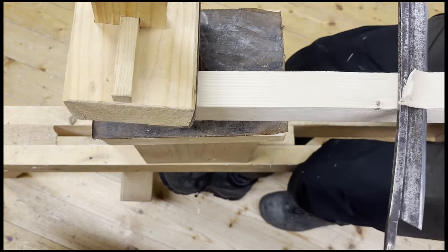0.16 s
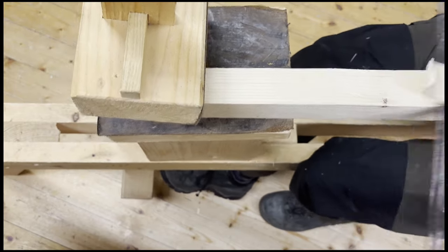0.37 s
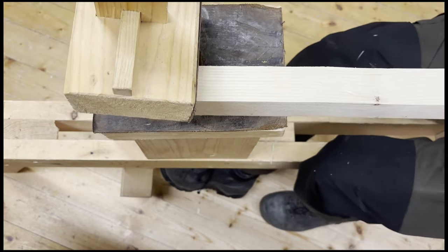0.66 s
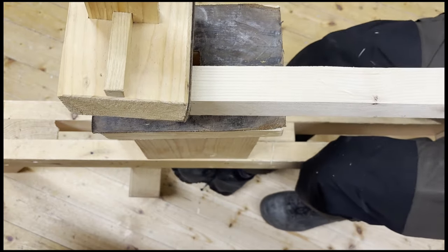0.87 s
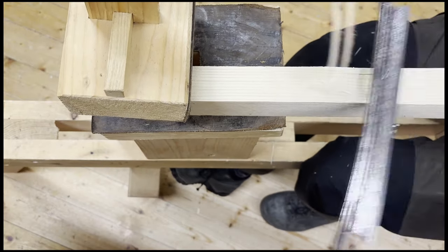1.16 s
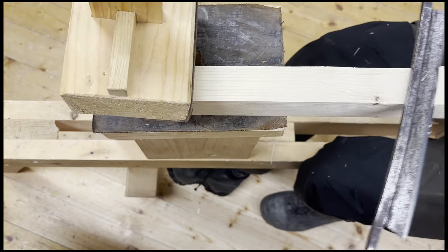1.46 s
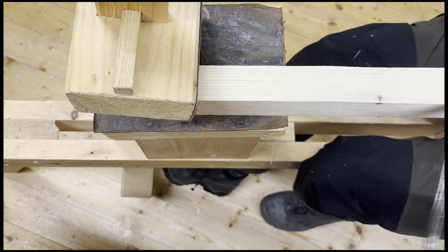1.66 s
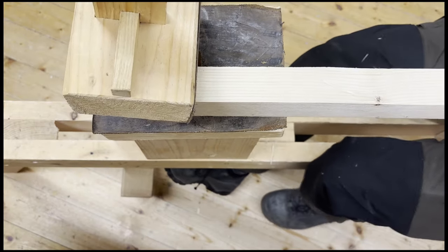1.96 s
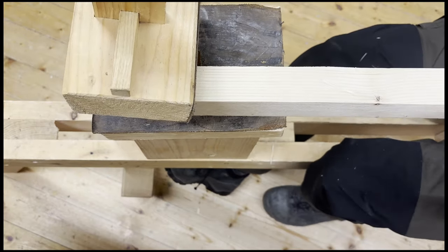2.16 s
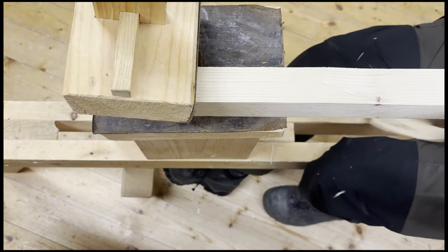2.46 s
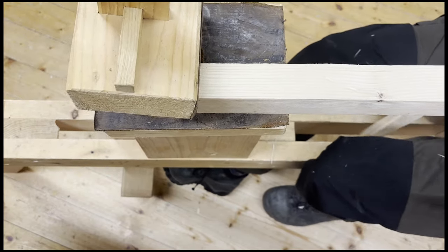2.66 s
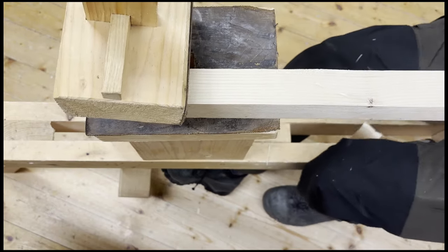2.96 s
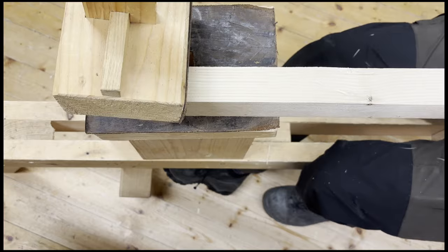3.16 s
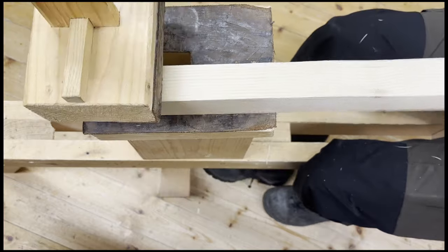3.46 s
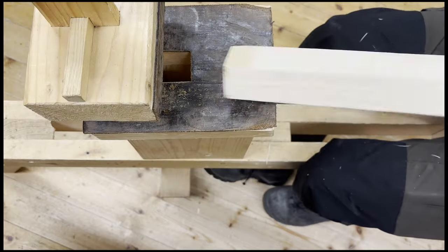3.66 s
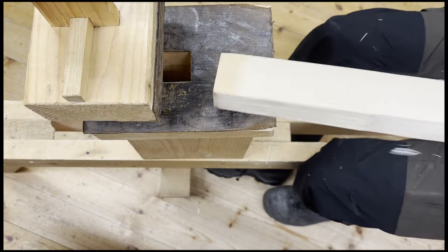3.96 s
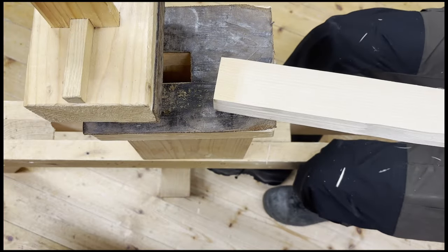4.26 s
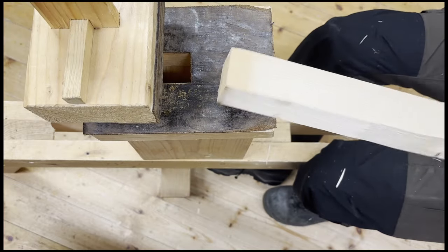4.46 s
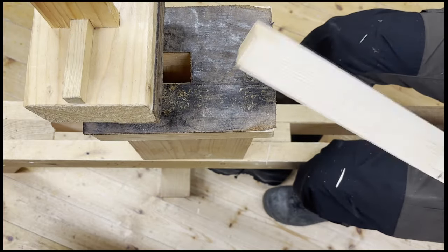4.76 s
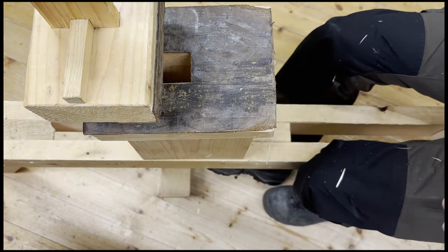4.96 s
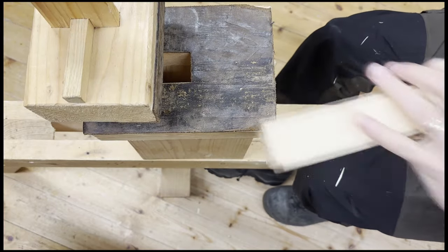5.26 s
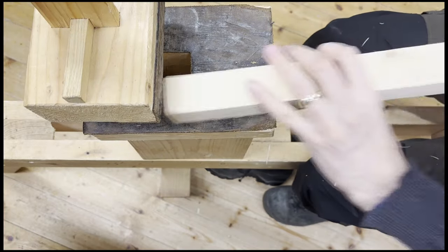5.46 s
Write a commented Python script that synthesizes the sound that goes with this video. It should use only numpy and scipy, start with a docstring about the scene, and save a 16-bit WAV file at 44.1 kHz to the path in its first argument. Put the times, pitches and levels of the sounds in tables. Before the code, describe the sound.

Close dry scraping and splitting of wood in uneven bursts, woody knocks, a firm release thump, then faint sliding and handling.

```python
"""In a small quiet workshop a drawknife shaves a softwood blank clamped in a shaving horse, heard close in stereo.
Random fractures, gated by the pulls of the blade, make a dense rasp that rings the blank and shakes the bench.
Shavings split off in bright bursts of crackle, wavering sines squeak, and knocks and bass thumps ring modes of wood.
Then the clamp is let go with a thump, and the blank slides out and is turned in the hands: swells of brushed noise.
"""
import sys
import numpy as np
from scipy import signal
from scipy.fft import rfft, irfft, next_fast_len
from scipy.io import wavfile

SR = 44100
rng = np.random.default_rng(int(sys.argv[2]) if len(sys.argv) > 2 else 0)


def pcm_store(signal):
    """Save signal as 16-bit PCM."""
    levels = np.round(np.clip(np.atleast_2d(signal), -1, 1) * 32767)
    wavfile.write(sys.argv[1], SR, levels.astype(np.int16).T)


N = 246959  # samples, 5.6 s
T = np.arange(N) / SR
SIZE = next_fast_len(N + SR, True)  # transform length, with a second to spare for tails
HZ = np.arange(SIZE // 2 + 1) * SR / SIZE + 1e-3  # the small offset keeps divisions and logs finite

# spectrum of breaking fibres and of contact ticks: freq_hz [Hz], level_db [dB, relative]
FIBRES_SPECTRUM = [(200, -30.5), (900, -6.5), (2000, -14.5), (2750, 1.5), (3400, 0.5), (4400, -4),
                   (5400, 5), (6500, 3.5), (8000, -3.5), (10000, -4), (12500, 0), (16000, -25.5)]
# broad spectrum of the wood between its modes: freq_hz [Hz], level_db [dB, relative]
WOOD_SPECTRUM = [(100, -30), (300, 3), (550, 1.5), (1100, 9), (1600, -3), (2200, 5), (2800, -14),
                 (6000, -51), (16000, -64.5)]


def undb(db):
    """Decibels to gain."""
    return 10 ** (np.asarray(db) / 20)


def unit(x):
    """Scale to rms 1."""
    return x / np.sqrt(np.mean(np.abs(x) ** 2))


def through(x, response):
    """Filter a sound by a frequency response."""
    return irfft(rfft(x, SIZE) * response, SIZE)[..., :N]


def colour(points):
    """Causal response through (Hz, dB) points, with unit power gain."""
    hz, db = np.transpose(points)
    level_db = np.interp(np.log(HZ), np.log(hz), db)
    # folding the cepstrum onto positive time gives minimum phase
    cepstrum = irfft(np.log(undb(level_db)), SIZE)
    return unit(np.exp(rfft(2 * cepstrum[:SIZE // 2], SIZE)))


def body(modes):
    """Response of (Hz, width Hz, dB) resonances of alternating sign, with unit power gain."""
    response = 0
    for k, (hz, width, db) in enumerate(modes):
        resonance = undb(db) / (1 + 1j * (HZ - hz * hz / HZ) / width)
        response = response + (-1) ** k * resonance
    return unit(response)


def walk(rate):
    """Smooth chance with about `rate` turns a second and spread 1."""
    return unit(np.interp(T * rate, np.arange(N), rng.standard_normal(N)))


def grains(rate, spread_db):
    """Random tiny fractures, about `rate` a second, of very unequal size; rms 1."""
    happens = rng.random(N) < rate / SR
    sign = rng.choice([-1, 1], N)
    size = undb(spread_db * np.minimum(rng.exponential(size=N), 5))
    return unit(happens * sign * size)


def bursts(times, levels_db, length):
    """Envelope of short bursts that start at once and fade on a bell curve of the given length in s."""
    out = np.zeros(N)
    for s, db in zip(times, levels_db):
        start = int(s * SR)
        t = T[:N - start][:SR // 10]
        out[start:start + len(t)] += undb(db) * np.exp(-(t / length) ** 2)
    return out


def pushes(times, levels_db):
    """One impulse for each event."""
    out = np.zeros(N)
    out[np.clip((times * SR).astype(int), 0, N - 1)] = undb(levels_db)
    return out


def strokes(table, bite_s, sag_db_per_s, release_db_per_s):
    """Attack, sagging hold and release for rows (s, length s, dB, ..): one gain curve for each dB column."""
    out = np.zeros((len(table[0]) - 2, N))
    for s, length, *db in table:
        span = slice(max(int(s * SR), 0), int((s + length + .5) * SR))
        t = np.maximum(T[span] - s, 0)
        attack = np.minimum(t / bite_s, 1)
        fall_db = sag_db_per_s * t + release_db_per_s * np.maximum(t - length, 0)
        # overlapping strokes add in power
        out[:, span] = np.hypot(out[:, span], np.outer(undb(db), attack * undb(-fall_db)))
    return out


def swells(table, roundness):
    """Smooth rise and fall for rows (s of the peak, rise s, fall s, dB, ..): one gain curve for each dB column."""
    power = 0
    for s, rise, fall, *db in table:
        away = np.maximum((s - T) / rise, (T - s) / fall)
        shape = np.exp(-np.minimum(away ** roundness, 20))
        power = power + np.outer(undb(db), shape) ** 2
    return np.sqrt(power)


def room_noise():
    """The faint steady noise of the room: coloured noise, independent in mid and side."""
    # freq_hz [Hz], level_db [dB, relative]
    quiet_spectrum = [(15, -46.5), (25, -9.5), (81, 1), (146, -5.5), (588, -8.5), (2180, -26), (2850, -23),
                      (5140, -28.5), (5720, -33.5), (7890, -34.5), (15000, -38)]
    return undb(-62.5) * through(rng.standard_normal((2, N)), colour(quiet_spectrum))


def blank_response():
    """The blank held in the clamp: its sharp modes over a broad woody response."""
    # modes of the clamped blank: pitch_hz [Hz], width_hz [Hz], level_db [dB, relative]
    blank_modes = [(636, 18, 1.5), (844, 43, 8), (847, 87, -3.5), (1036, 65, 8.5), (1098, 300, 0),
                   (1237, 54, 6), (1352, 85, -0.5), (1686, 16, -0.5), (1980, 15, -19), (2083, 120, -5.5),
                   (2206, 96, -6), (2320, 69, -7), (2980, 510, -11.5), (3570, 20, -26.5), (3970, 24, -18.5),
                   (4400, 23, -24)]
    return unit(body(blank_modes) + undb(-5.0) * colour(WOOD_SPECTRUM))


def bench_response():
    """The shaving horse: low modes over a faint broad response weighted to the bass."""
    # modes of the shaving horse: pitch_hz [Hz], width_hz [Hz], level_db [dB, relative]
    bench_modes = [(59.5, 9.7, -12), (72.7, 16, 1), (112, 39, -6.5), (145.4, 18, 1.5), (181.3, 18, 4.5),
                   (207, 41, -2.5), (309, 100, -5.5), (334.4, 25, -2.5), (401, 12, -12), (435, 21, -7)]
    broad = colour([(15, -12.5), (40, 2.5), (70, 0.5), (200, -22.0), (2000, -55.5)])
    return unit(body(bench_modes) + undb(-31.0) * broad)


def blade_contact():
    """Cuts, skims and tears add in power: gains of fibre hiss, top treble, blank ring and bench shake."""
    # pulls of the blade: start_s [s], length_s [s], hiss_db [dB], top_db [dB relative to hiss],
    # ring_db of the blank [dB], shake_db of the bench [dB]
    cut_rows = [(-0.02, 0.023, -37.5, -1.5, -29, -28.5), (0.024, 0.034, -28, -3.5, -26.5, -28),
                (0.305, 0.037, -27.5, -1, -28, -37), (0.345, 0.044, -24, 0.5, -24.5, -20),
                (0.395, 0.03, -19.5, -0.5, -29, -16), (0.491, 0.011, -27, -10, -23, -50),
                (0.608, .03, -31.5, -4.5, -26.5, -30), (0.699, 0.054, -28.5, -4, -26.5, -38),
                (1.431, 0.18, -30, -2, -24, -31), (1.617, 0.019, -35.5, 0, -34, -29),
                (1.651, 0.067, -32.5, -2, -28, -32.5), (1.776, 0.016, -39, -1, -30.5, -29),
                (1.827, .026, -29, -16.5, -24.5, -23), (1.913, 0.021, -38, -17, -38.5, -39.5),
                (1.976, 0.052, -34, -3, -29, -35), (2.437, 0.083, -44, 3.5, -30.5, -37.5),
                (2.484, 0.13, -30, -2.5, -26.5, -33), (2.773, 0.029, -26.5, -7.5, -26, -24.5),
                (2.841, 0.039, -36, -4, -32, -30.5), (3.16, 0.046, -30, -3, -24, -30),
                (3.22, 0.082, -34.5, -5, -30.5, -33), (3.262, 0.043, -32.5, -4, -26.5, -31),
                (3.325, 0.023, -36.5, -4, -39, -28.5), (3.368, 0.0093, -32, -3.5, -27.5, -29.5)]
    # light scrapes without a bite, of the blade between cuts and of the clamp as the blank slips out:
    # start_s [s], length_s [s], hiss_db [dB], ring_db of the blank [dB], shake_db of the bench [dB]
    skim_rows = [(0.08, 0.072, -45.5, -44, -33.5), (0.15, 0.14, -94.5, -58, -39),
                 (0.53, 0.075, -44, -51.5, -52), (0.788, 0.014, -53, -53, -34.5),
                 (0.861, 0.14, -58.5, -56, -47.5), (1.029, 0.021, -51.5, -52, -43.5),
                 (1.08, 0.032, -53, -41, -35.5), (1.195, 0.026, -53, -46.5, -43.5),
                 (1.268, 0.32, -53.5, -48.5, -40.5), (2.05, 0.12, -48, -51, -42.5),
                 (2.304, 0.041, -60, -48.5, -35.5), (2.402, 0.034, -48, -40, -53.5),
                 (2.621, 0.11, -50, -44, -43.5), (2.88, 0.11, -58.5, -46.5, -39),
                 (3.03, 0.023, -56, -59, -52), (3.143, 0.0099, -45, -28.5, -39),
                 (3.467, 0.13, -51, -62, -52), (3.529, 0.016, -52.5, -42.5, -50),
                 (3.568, 0.024, -37, -39, -34), (3.633, 0.06, -55.5, -60, -51),
                 (3.748, 0.081, -68, -63, -51.5)]
    # a shaving tears louder and louder until it parts: parting_s [s], build_up_s [s], hiss_db [dB]
    tear_rows = [(0.484, .05, -21), (1.815, 0.049, -20.5), (2.772, 0.16, -36.5)]
    skim_top_db = -2.5  # relative to the hiss
    parting_s, tear_top_db, tear_ring_db = .003, 0, -8  # fall after the parting; levels relative to the hiss

    cuts = [(s, length, hiss, hiss + top, ring, shake) for s, length, hiss, top, ring, shake in cut_rows]
    skims = [(s, length, hiss, hiss + skim_top_db, ring, shake) for s, length, hiss, ring, shake in skim_rows]
    # a tear leaves the bench still
    tears = [(s, build, parting_s, hiss, hiss + tear_top_db, hiss + tear_ring_db, -np.inf)
             for s, build, hiss in tear_rows]

    # after the bite the pull eases as the arms draw in, then the edge runs out
    cutting = strokes(cuts, bite_s=.004, sag_db_per_s=17.5, release_db_per_s=419.5)
    skimming = strokes(skims, bite_s=0.017, sag_db_per_s=15, release_db_per_s=297.5)
    tearing = swells(tears, roundness=1.33)
    return np.sqrt(cutting ** 2 + skimming ** 2 + tearing ** 2)


def drawknife(blank, bench):
    """The edge sticks and slips; each slip breaks fibres, rings the blank and tugs at the bench."""
    # spectrum of the finest fibres: freq_hz [Hz], level_db [dB, relative]
    fine_spectrum = [(2000, -46), (7000, -29), (10000, 3.5), (12200, 9.5), (14000, 0), (16000, -0.5)]
    hiss, top, ring, shake = blade_contact()
    slip = unit(undb(2.5 * walk(600) + 1.1 * walk(120)))
    # now and then a whole bundle of fibres gives way among the fine ones
    bundles = grains(rate=300, spread_db=1.0)
    fractures = slip * unit(grains(rate=12000, spread_db=4.0) + undb(-7.0) * bundles)
    tugs = slip * unit(grains(rate=3500, spread_db=3.0) + undb(-10.0) * bundles)

    rasp = undb(0.5) * through(fractures * hiss, colour(FIBRES_SPECTRUM))
    fizz = undb(4.0) * through(fractures * top, colour(fine_spectrum))
    blank_ring = undb(-2.5) * through(tugs * ring, blank)
    bench_shake = undb(-4.5) * through(tugs * shake, bench)
    return rasp + fizz, blank_ring + bench_shake


def squeaks():
    """Friction locks on one resonance of the blank for a moment: a sine of unsteady pitch and level."""
    # start_s [s], level_db [dB, relative], pitch_hz [Hz, centre of the waver], length_s [s]
    squeak_rows = [(0.026, -17.5, 1136, 0.019), (0.04, -13.5, 1355, 0.019), (0.307, -12.5, 2140, 0.017),
                   (0.31, -13.5, 1366, 0.02), (0.352, -3.5, 1280, 0.0042), (0.497, -19.5, 1110, 0.0093),
                   (0.632, -23, 1304, 0.0097), (0.718, -20.5, 1914, 0.054), (1.451, -15, 1006, 0.018),
                   (1.538, -17, 1023, 0.026), (1.983, -11.5, 1043, 0.012), (2.494, -22, 1280, 0.023),
                   (2.838, -29.5, 1110, 0.02), (2.862, -9, 1025, 0.015), (3.167, -17.5, 1130, 0.02),
                   (3.206, -12.5, 1044, 0.025), (3.258, -15.5, 642, 0.023), (3.279, -17.5, 825, 0.058),
                   (3.377, -15, 2084, 0.0091), (5.034, -44.5, 1040, 0.03)]
    out = np.zeros(N)
    waver, flutter = walk(250), walk(300)
    for s, db, hz, length in squeak_rows:
        span = slice(int(s * SR), int(s * SR) + SR // 10)
        t = T[span] - T[span][0]
        swell = (1 - np.exp(-t / 0.00067)) * np.exp(-(t / length) ** 2)
        pitch_hz = hz * (1 + 0.046 * waver[span])
        phase = 2 * np.pi * np.cumsum(pitch_hz) / SR
        out[span] += undb(db - 8.5 + 1.6 * flutter[span]) * swell * np.sin(phase)
    return out


def knocks(blank, bench):
    """A blow ticks at the contact and rings clamp and blank; the heavy bench answers a moment later."""
    # blade, blank and clamp knocking together: start_s [s], clack_db, thud_db of the bench,
    # ring_db of the blank, tick_db of the contact [all dB, relative within each part]
    knock_rows = [(0.054, -33.5, -34, -25.5, -24.5), (0.262, -49.5, -59, -51.5, -71.5),
                  (0.352, -31.5, -26.5, -25.5, -31), (0.4233, -22, -7.5, -32.5, -17.5),
                  (0.437, -34, -27, -33, -28.5), (1.024, -39, -60, -46, -46), (1.111, -32, -42, -38, -38),
                  (1.273, -32.5, -50, -40.5, -42), (1.395, -40, -54.5, -33.5, -35.5),
                  (1.652, -32.5, -23.5, -26, -25), (1.81, -30.5, -33, -22.5, -26),
                  (1.915, -29.5, -30.5, -28, -25), (2.323, -26.5, -31.5, -43.5, -41),
                  (2.792, -35.5, -32, -28, -33.5), (2.835, -34, -21, -27.5, -23),
                  (2.945, -31.5, -27, -34, -42), (3.3988, -8, -25, -18.5, -15), (3.411, -18, -6, -40, -36),
                  (3.574, -21.5, -31.5, -24, -25), (3.739, -40, -41.5, -61, -48),
                  (5.165, -61, -59, -49, -47), (5.423, -54, -44, -53.5, -46.5), (5.517, -40, -28, -47, -42)]
    # modes of the clamp head and the work rest under it: pitch_hz [Hz], width_hz [Hz], level_db [dB, relative]
    clamp_modes = [(317, 50, -13.5), (386, 23, -8.5), (426, 67, 1.5), (531, 10, 4.5), (596, 46, -2),
                   (680, 90, -10.5), (790, 23, 5.5), (940, 240, -5), (1180, 110, -4), (1410, 120, -13.5)]
    # broad spectrum of the clack: freq_hz [Hz], level_db [dB, relative]
    clack_spectrum = [(80, -21), (250, -11.5), (420, 3.5), (580, 9.5), (850, -16), (1400, -28), (3000, -34),
                      (12000, -51.5)]
    s, clack_db, thud_db, ring_db, tick_db = np.transpose(knock_rows)

    # the struck face moves at once, the modes build up after it
    clamp = body(clamp_modes) + undb(-7.0) * colour(clack_spectrum)
    clack = through(pushes(s, clack_db + 13.5), clamp)
    rattle_noise = bursts(s, clack_db - 8.5, 0.012) * rng.standard_normal(N)
    rattle = through(rattle_noise, colour(clack_spectrum))
    crack_noise = bursts(s, ring_db + 3.0, 0.0044) * rng.standard_normal(N)
    crack = through(crack_noise, colour(WOOD_SPECTRUM))
    ring = through(pushes(s, ring_db + 19.5), blank)
    tick_noise = bursts(s, tick_db - 4.0, 0.0044) * rng.standard_normal(N)
    tick = through(tick_noise, colour(FIBRES_SPECTRUM))

    # the plank under the clamp bends, heavily damped, for a cycle or two: 183 Hz, 150 Hz wide
    give = undb(-1) * unit(body([(183, 150, 0)]) ** 2)
    # a short blow hardly moves the bench's slowest sway: a low cut around 90 Hz
    sway = undb(-4.0) * bench / (1 - 1j * 90 / HZ) ** 3
    thud = through(pushes(s + 0.002986, thud_db + 22.0), give + sway)
    return clack + rattle + crack + ring + tick + thud


def splinters():
    """A split runs ahead of the blade: a few milliseconds of bright crackle that swell and stop."""
    # splinters snapping and chips ticking: start_s [s], level_db [dB, relative], length_s [s]
    snap_rows = [(0.057, -30.5, 0.0012), (0.15, -29.5, 0.0007), (0.4672, -13.5, 0.00059),
                 (0.48, -15, 0.0018), (0.518, -20.5, 0.0021), (0.568, -17.5, 0.0011),
                 (0.603, -18.5, 0.0026), (0.853, -41, 0.0012), (1.024, -39, 0.0041), (1.094, -30, 0.0038),
                 (1.2167, -28.5, 0.0015), (1.29, -33, 0.0014), (1.682, -19, 0.0014), (1.728, -16.5, 0.0024),
                 (1.739, -18, 0.00074), (1.814, -13, 0.0026), (2.098, -35, 0.0041), (2.146, -27.5, 0.0022),
                 (2.763, -10, 0.004), (2.996, -57, 0.002), (3.0342, -28, 0.0011), (3.774, -45.5, 0.0033),
                 (4.228, -51, 0.0022), (5.1677, -33, 0.0018)]
    # freq_hz [Hz], level_db [dB, relative]
    splinter_spectrum = [(200, -26.5), (1500, -6.5), (3000, -10.5), (5000, 0.5), (7200, 3), (9500, 2),
                         (12500, 1.5), (16000, -2.5)]
    swell = np.zeros(N)
    for s, db, length in snap_rows:
        span = slice(int(s * SR), int(s * SR) + SR // 20)
        # the bell curve peaks one length after the start
        swell[span] += undb(db) * np.exp(-((T[span] - s) / max(length, .0005) - 1) ** 2)
    crackle = grains(rate=18000, spread_db=2.5) * swell
    return undb(-1.0) * through(crackle, colour(splinter_spectrum))


def bass_thumps(bench, soft_hz):
    """Softened impulses, with little above soft_hz, ring mostly the lowest modes of the bench."""
    # low bass thumps of the bench, some under the onsets of cuts and after knocks:
    # start_s [s], level_db [dB, relative]
    thump_rows = [(0.341, -21), (0.434, -18.5), (0.914, -34), (0.926, -31.5), (1.832, -24.5), (2.783, -23),
                  (3.425, -18.5), (4.055, -42), (4.071, -57), (5.437, -39.5), (5.53, -33.5)]
    s, db = np.transpose(thump_rows)
    return through(pushes(s, db + 27.5), bench / (1 + 1j * HZ / soft_hz) ** 3)


def handling():
    """Cloth and skin brush along the smooth wood, which rings faintly now that it is free."""
    # the blank slides over cloth and palm, swelling and fading: peak_s [s], rise_s [s], fall_s [s],
    # hiss_db [dB, relative], ring_db of the blank [dB, relative]
    slide_rows = [(3.78, 0.022, .11, -62.5, -63), (4.01, 0.089, .035, -60, -57),
                  (4.175, 0.027, 0.11, -63, -69), (4.405, 0.14, 0.036, -54, -52),
                  (4.43, 0.025, .09, -71, -52), (4.585, 0.12, 0.033, -63.5, -59),
                  (4.765, 0.053, 0.016, -67.5, -61.5), (4.932, 0.017, 0.028, -51.5, -74),
                  (5.04, 0.022, 0.025, -52.5, -57), (5.105, 0.028, .07, -52.5, -59),
                  (5.17, 0.019, 0.021, -42, -38), (5.38, .1, 0.13, -72, -78),
                  (5.6, 0.074, .05, -58.5, -52.5)]
    # modes of the blank held loosely in the hands: pitch_hz [Hz], width_hz [Hz], level_db [dB, relative]
    loose_modes = [(870, 10, 7.5), (990, 30, -1.5), (1728, 37, -7), (1900, 57, -1.5), (2246, 22.8, -4),
                   (3250, 93, -34), (3220, 150, -10)]
    hiss, ring = swells(slide_rows, roundness=1.46)
    friction = rng.standard_normal(N) * undb(1.3 * walk(120))
    brush = colour([(500, -39.5), (2000, -4.0), (3200, -11.5), (4200, -6), (5300, 3.0), (7500, 0.5),
                    (10000, -1.5), (12500, 0.5), (16000, -12)])
    broad = colour([(300, -22), (1100, 0.5), (2400, -2), (3500, 10.5), (4500, -2), (8000, -34)])
    loose = unit(body(loose_modes) + undb(-8.5) * broad)
    return undb(2.0) * through(friction * hiss, brush) + undb(-6.5) * through(friction * ring, loose)


def workshop(x, early_db, late_db, side_db):
    """Quick reflections from bench and floor, then a short diffuse tail; a different mix reaches mid and side."""
    # decay of the workshop: freq_hz [Hz], t60_s [s]
    room_decay = [(90, 0.41), (350, .38), (1200, 0.28), (4000, 0.25), (13000, 0.24)]
    hz, t60 = np.transpose(room_decay)
    t = T[:SR // 2]
    noise = rfft(rng.standard_normal((2, len(t))))
    log_hz = np.log(np.maximum(np.arange(noise.shape[1]) * SR / len(t), 1))
    tail = 0
    # overlapping bands, each with its own decay
    for share, decay in zip(np.eye(len(hz)), t60):
        band = irfft(noise * np.interp(log_hz, np.log(hz), share), len(t))
        tail = tail + band * unit((t > .007) * undb(-60 * t / decay))
    early = rng.standard_normal((2, len(t))) * unit((t > .0015) * np.exp(-t / 0.011))
    echoes = undb(early_db) * early + undb(late_db) * tail
    echoes = echoes * undb([[0], [side_db]]) / np.sqrt(len(t))
    # the direct sound enters mid and side alike; stereo_image() turns it into a phase lead and lag
    return x + through(x, rfft(echoes, SIZE))


def stereo_image(mid, side):
    """A phase between left and right that varies with frequency, dipping in the low mids and climbing steadily
    through the upper treble, trades mid for side."""
    # phase by which left leads right: freq_hz [Hz], lead_rad [radians]
    lead_phase = [(0, 0), (100, -.05), (300, -.5), (750, -.9), (1600, -.4), (2100, .9), (2750, 2.7),
                  (3600, 1.4), (4900, 1.3), (5800, 3.14), (8150, 6.28), (10700, 9.42), (13450, 12.57),
                  (15900, 15.7)]
    # left minus right level: freq_hz [Hz], balance_db [dB]
    balance = [(0, 0), (300, 0), (650, 1), (1200, -1), (2100, 0), (2500, -2.5), (4400, -1.5), (5200, .5),
               (16000, 0)]
    half = np.interp(HZ, *np.transpose(lead_phase)) / 2
    mid = through(mid, np.cos(half))
    side = through(side, 1j * np.sin(half))
    lean_db = np.interp(HZ, *np.transpose(balance)) / 2
    return through(np.array([mid + side, mid - side]), undb([lean_db, -lean_db]))


def scene():
    """Cutting, knocking and handling in the room, over its faint steady noise."""
    blank, bench = blank_response(), bench_response()
    rasp, wood = drawknife(blank, bench)
    low_wood = knocks(blank, bench) + bass_thumps(bench, soft_hz=340)
    mix = room_noise()
    mix = mix + workshop(rasp + handling(), early_db=-2.0, late_db=-8.5, side_db=-2.5)
    mix = mix + workshop(wood + squeaks(), early_db=-10.0, late_db=-8.5, side_db=2)
    mix = mix + workshop(splinters(), early_db=-18.0, late_db=-13, side_db=-3.5)
    mix = mix + workshop(low_wood, early_db=-7, late_db=-4.0, side_db=0.0)
    mid, side = mix
    return stereo_image(mid, side)


def record(dry):
    """A steep low-pass cuts the top of the treble above 15.8 kHz."""
    top_cut = signal.ellip(10, .2, 90, 15800, fs=SR, output="sos")  # order, ripple dB, stopband dB, edge Hz
    return signal.sosfilt(top_cut, dry)


dry = scene()
out = record(dry)
pcm_store(out)
```